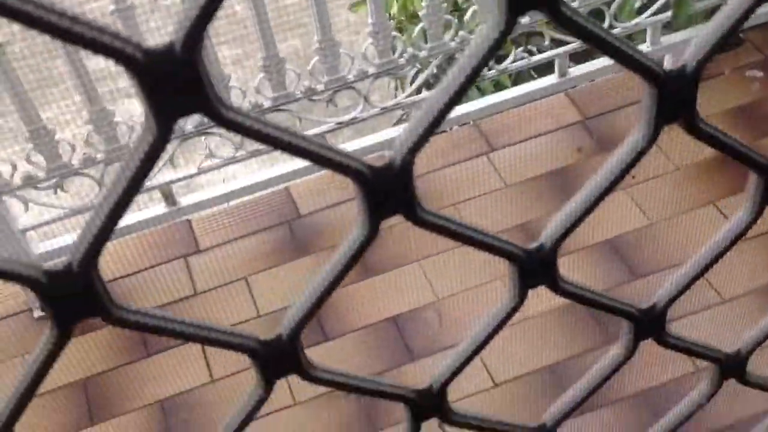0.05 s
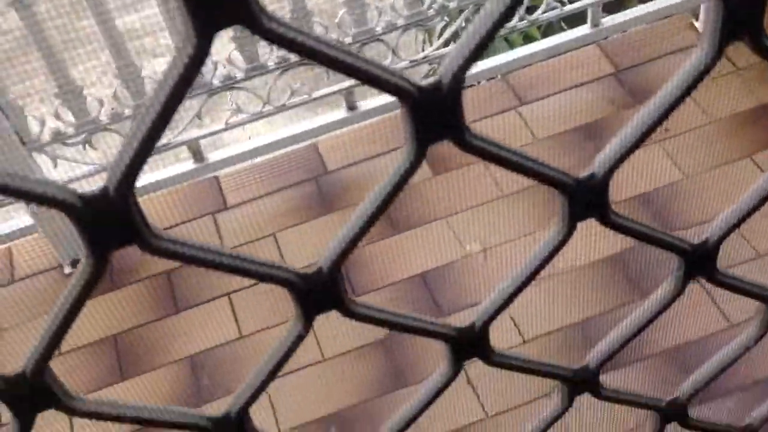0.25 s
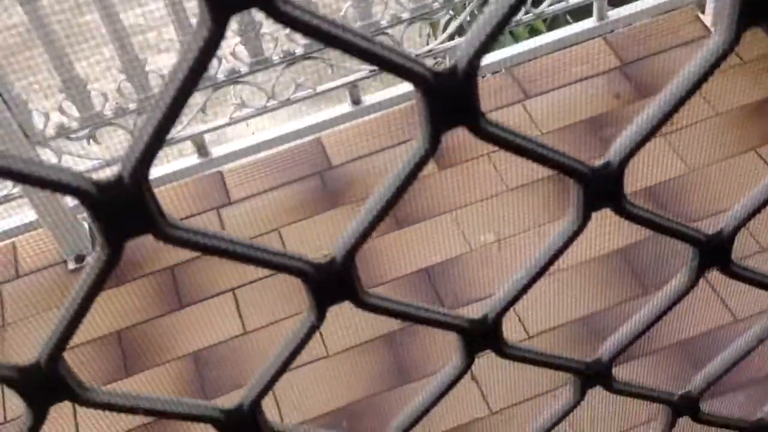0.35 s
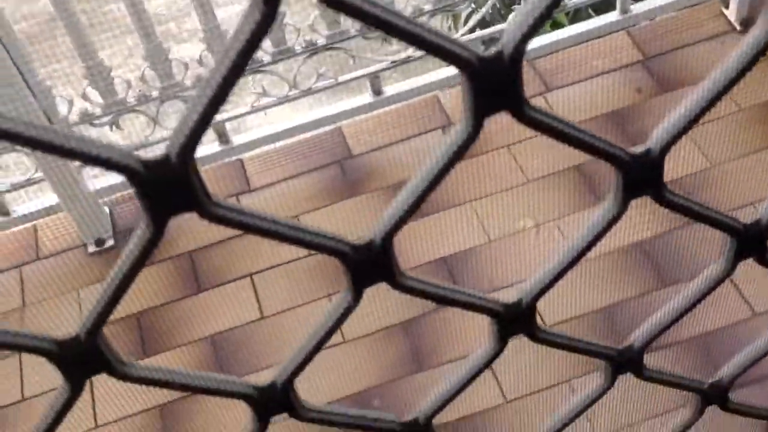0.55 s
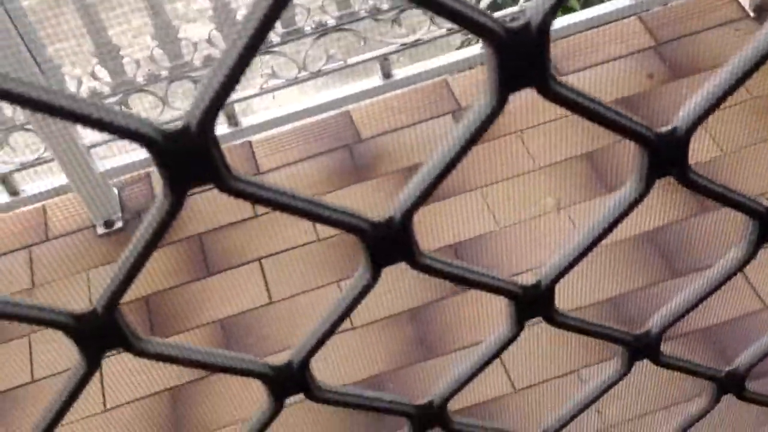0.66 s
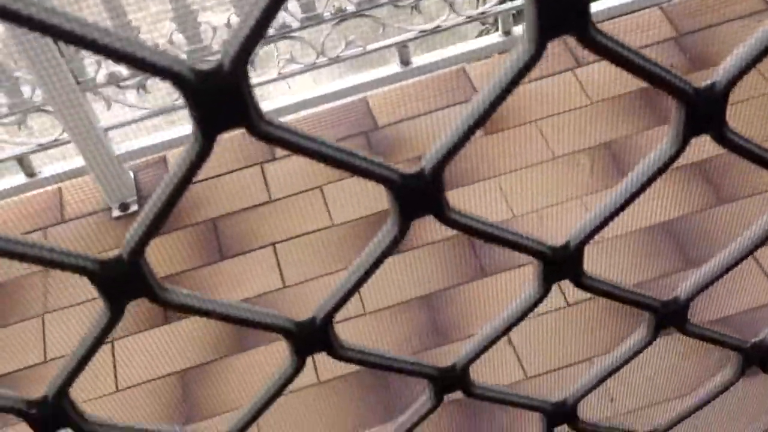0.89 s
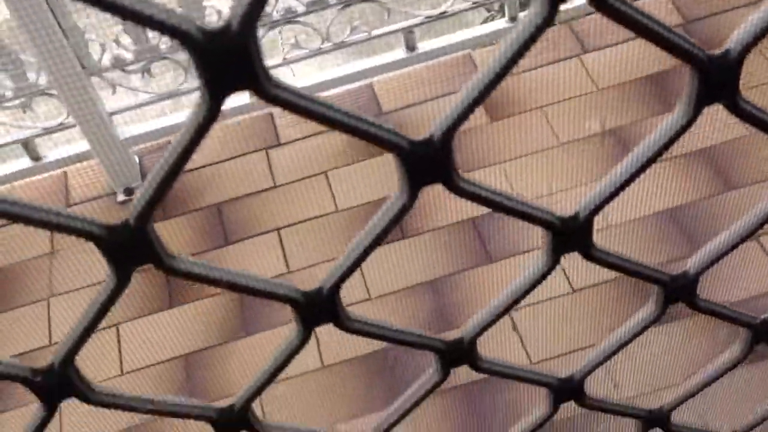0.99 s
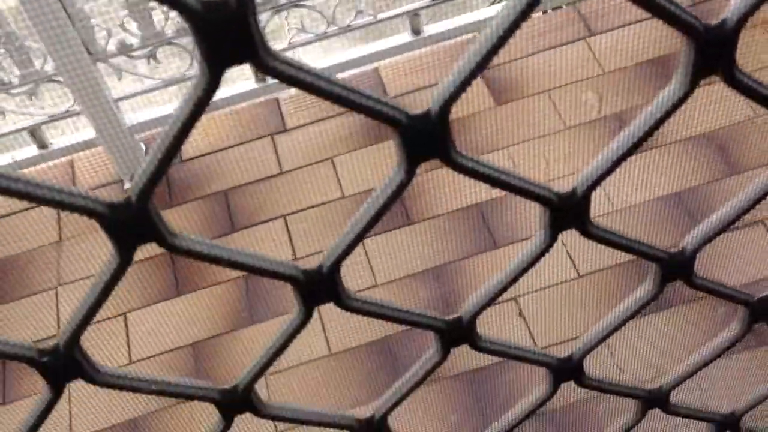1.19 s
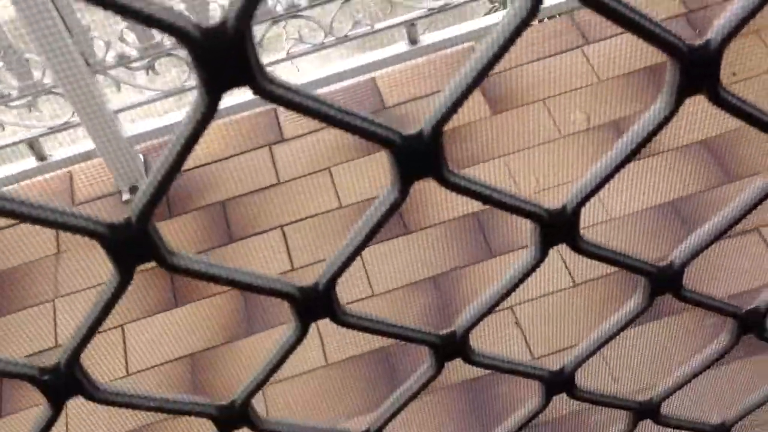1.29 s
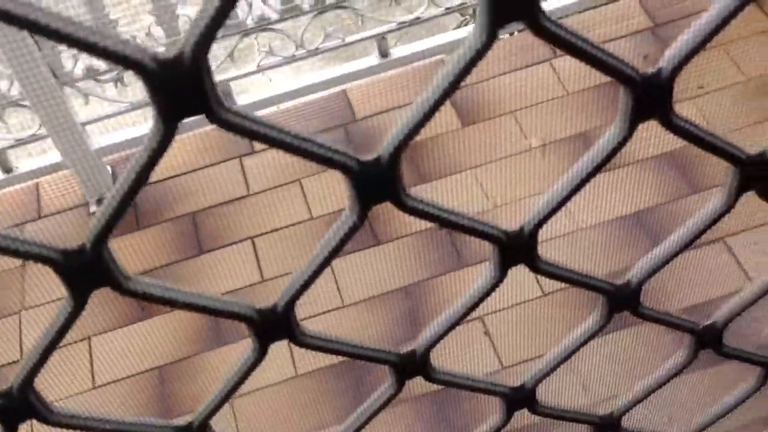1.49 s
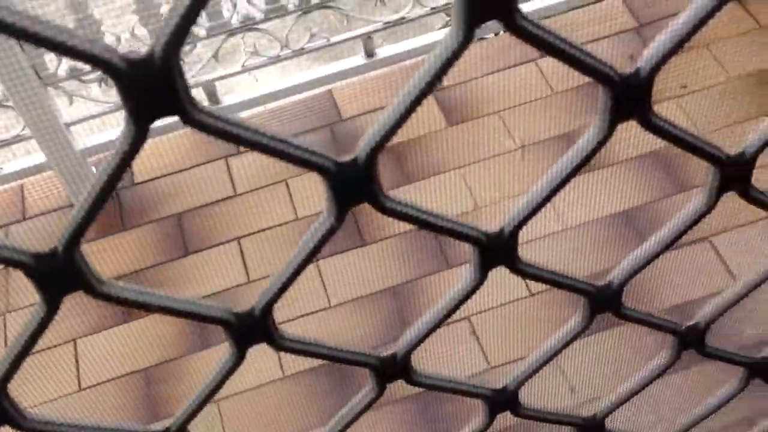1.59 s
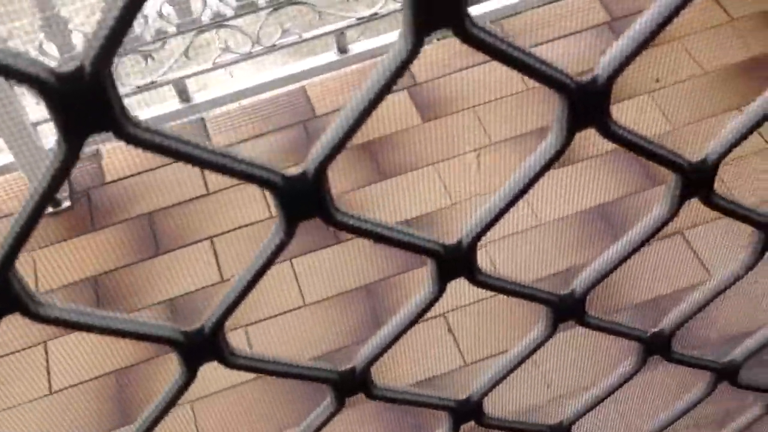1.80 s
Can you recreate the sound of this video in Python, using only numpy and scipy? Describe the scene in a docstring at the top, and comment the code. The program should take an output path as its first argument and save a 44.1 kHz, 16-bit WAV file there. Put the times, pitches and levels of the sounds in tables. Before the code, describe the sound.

A metal grille door's latch clacks, then the door bangs shut and rattles.

```python
"""A latch clacks and rattles over faint outdoor hiss as a metal grille door on a tiled porch is worked
shut; then the door bangs into its frame and chatters. Each impact excites dense, quickly damped
resonances and the ringing modes of latch or bars, and reflections from the hard walls reverberate.
A loose part clinks; a light tap, a small friction squeak and faint rustling follow.
A small bird whistles thinly while the door is being shut."""
import sys
import numpy as np
from scipy import signal
from scipy.fft import rfft, irfft, next_fast_len
from scipy.io import wavfile

SR = 44100
rng = np.random.default_rng(int(sys.argv[2]) if len(sys.argv) > 2 else 0)


def dump(signal):
    """Clip the signal to [-1, 1] and save it as 16-bit WAV at the path in sys.argv[1]."""
    limited = np.clip(np.atleast_2d(signal).T, -1, 1)
    pcm = np.round(limited * 32767).astype(np.int16)
    wavfile.write(sys.argv[1], SR, pcm)


N = 81585
T = np.arange(N) / SR


def from_db(db):
    """Amplitude ratio of a level: a factor of ten per 20 dB."""
    return 10 ** (np.asarray(db) / 20)


def unit_rms(x):
    """Normalisation to a root-mean-square value of one."""
    return x / np.sqrt(np.mean(x ** 2) + 1e-20)


def at_hz(points, hz):
    """Linear interpolation on a logarithmic frequency axis."""
    f, values = np.transpose(points)
    return np.interp(np.log(hz + 1e-3), np.log(f), values)


def coloured(x, spectrum):
    """Causal minimum-phase filtering of unit power gain: only the spectrum's shape counts."""
    size = 2 * next_fast_len(N // 2 + 4096, real=True)
    gain = unit_rms(from_db(at_hz(spectrum, np.arange(size // 2 + 1) * SR / size)))
    cepstrum = irfft(np.log(gain))[:size // 2]
    response = np.exp(2 * rfft(cepstrum, size) - cepstrum[0])
    return irfft(rfft(x, size) * response)[:N]


def noise(spectrum):
    """Stationary Gaussian noise, spectrally shaped, with an rms near one."""
    return coloured(rng.standard_normal(N), spectrum)


def fluctuation(cutoff_hz, shape=N):
    """Random modulation: low-pass noise of unit rms."""
    lowpass = signal.butter(2, cutoff_hz, fs=SR, output="sos")
    return unit_rms(signal.sosfilt(lowpass, rng.standard_normal(shape)))


def octaves(x):
    """Complementary filter bank: overlapping octave bands that sum to x, as (centre/Hz, band)."""
    size = next_fast_len(N, real=True)
    centres = 110 * 2. ** np.arange(8)
    spectrum, hz = rfft(x, size), np.arange(size // 2 + 1) * SR / size
    return [(c, irfft(spectrum * at_hz(np.c_[centres, centres == c], hz), size)[:N]) for c in centres]


def decay(start, t60, rise=.0012):
    """Exponential damping after a quick rise: the level falls 60 dB in t60 seconds."""
    age = np.maximum(T - start, 0)
    return (1 - np.exp(-age / rise)) * np.exp(-np.minimum(np.log(1000) * age / t60, 20))


def struck_modes(start, modes):
    """Free vibration after one blow: a superposition of damped sinusoids."""
    return sum(from_db(db) * decay(start, t60) * np.sin(2 * np.pi * hz * (T - start))
               for hz, db, t60 in modes)


# Spectra of the outdoor hiss and rumble: f/Hz, relative density level/dB
HISS_SPECTRUM = [(40, -26), (150, 8), (400, -2), (1000, 0), (2400, -2), (5000, -5), (9000, -12),
                 (15000, -24.5)]
RUMBLE_SPECTRUM = [(25, -14), (55, -13), (80, -2.5), (110, -15.5), (165, 0), (300, -0.5), (500, -12),
                   (1000, -13.5), (3000, -29.5)]
# Their envelopes: t/s, level/dB
HISS_LEVELS = [(0, -54), (.2, -53.5), (1.2, -53.5), (1.44, -56.5), (1.65, -53), (1.85, -54)]
RUMBLE_LEVELS = [(0, -55.5), (.2, -62), (1.15, -54.5), (1.4, -57), (1.7, -60), (1.8, -51), (1.85, -53)]
def background():
    """Ambient noise: outdoor hiss and distant rumble add incoherently, each drifting in level."""
    hiss = from_db(np.interp(T, *np.transpose(HISS_LEVELS))) * noise(HISS_SPECTRUM)
    rumble = from_db(np.interp(T, *np.transpose(RUMBLE_LEVELS))) * noise(RUMBLE_SPECTRUM)
    return hiss + rumble


# Soft rustles close by: centre t/s, standard deviation/s, level/dB
RUSTLE_SWELLS = [(1.083, .05, -47.5), (1.32, 0.061, -54.5), (1.593, 0.084, -57.5), (1.767, 0.035, -51.5)]
# Their spectrum: f/Hz, relative density level/dB
RUSTLE_SPECTRUM = [(40, -39), (200, -4), (900, -13.5), (1900, -5.5), (2450, 2.5), (3100, -8), (3900, -3),
                   (7000, -18), (15000, -37)]
def rustles():
    """Amplitude modulation: noise swells and fades under Gaussian envelopes."""
    swells = sum(from_db(db) * np.exp(-.5 * ((T - centre) / width) ** 2)
                 for centre, width, db in RUSTLE_SWELLS)
    return swells * noise(RUSTLE_SPECTRUM)


# Bird whistles: t/s, duration/s, start f/Hz, end f/Hz, level/dB
BIRD_WHISTLES = [(0.124, 0.039, 6140, 6200, -51.5), (0.525, 0.081, 6330, 6300, -36),
                 (0.669, 0.079, 6630, 6640, -38), (0.802, 0.076, 6900, 7100, -41)]
def bird(waver_hz=70, flutter_db=3):
    """Thin gliding tones, roughened by random frequency and amplitude modulation."""
    out = 0
    waver, flutter = fluctuation(150, (2, N))
    for start, length, start_hz, end_hz, db in BIRD_WHISTLES:
        progress = np.clip((T - start) / length, 0, 1)
        hz = start_hz + (end_hz - start_hz) * np.sin(np.pi * progress / 2) + waver_hz * waver
        envelope = from_db(db + flutter_db * flutter) * np.sin(np.pi * progress)
        out += envelope * np.sin(2 * np.pi * np.cumsum(hz) / SR)
    return out


# Course of the squeak: t/s, f/Hz, level/dB
SQUEAK_TRACK = [(1.525, 2666, -57), (1.535, 2700, -45), (1.546, 2466, -50), (1.562, 2410, -55),
                (1.59, 2430, -87)]
def squeak(half_width_hz=230):
    """Friction tone: narrow-band noise about a slightly falling centre frequency."""
    times, hz, db = np.transpose(SQUEAK_TRACK)
    in_phase, quadrature = fluctuation(half_width_hz, (2, N))
    phase = 2 * np.pi * np.cumsum(np.interp(T, times, hz)) / SR
    tone = unit_rms(in_phase * np.cos(phase) + quadrature * np.sin(phase))
    return tone * from_db(np.interp(T, times, db)) * (T > times[0]) * (T < times[-1])


# Reverberation time of the tiled porch: f/Hz, T60/s
PORCH_T60 = [(150, 1.08), (400, 1.21), (1000, 0.79), (2700, 0.71), (7000, 0.59), (14000, 0.53)]
def porch_tail(start, hz):
    """Reverberant envelope: wall reflections build up and die away, the lows lasting longest."""
    return decay(start, at_hz(PORCH_T60, hz), rise=.0033)


# Dull spectrum of the tap: f/Hz, relative density level/dB
TAP_SPECTRUM = [(40, -43), (120, -17), (400, -2), (800, -1.5), (1150, 0), (1850, -2), (3500, -9.5),
                (5000, -20), (15000, -40)]
# Its modes: f/Hz, level/dB, T60/s
TAP_RESONANCES = [(1107, -38, 0.077), (1810, -46, 0.062)]
def tap(start=1.4816, level_db=-37.5, room_db=-13):
    """A light impact: a noise burst, two heavily damped modes and a little reverberation."""
    lowest_hz = TAP_RESONANCES[0][0]
    envelope = decay(start, t60=.049) + from_db(room_db) * porch_tail(start, lowest_hz)
    return from_db(level_db) * envelope * noise(TAP_SPECTRUM) + struck_modes(start, TAP_RESONANCES)


# Modes of a small loose part: f/Hz, level/dB, T60/s
CLINK_MODES = [(3890, -27.5, 0.096), (4860, -31, 0.11), (5405, -27.5, 0.098), (5630, -32, 0.12),
               (5440, -27.5, 0.093), (7950, -47, 0.12)]
def clink():
    """Free vibration of a loose part, struck once as the door settles."""
    return struck_modes(.7815, CLINK_MODES)


def impacts(contacts, spectrum, bass_hz=710, treble_hz=4860, buzz_db=1.5):
    """Dense resonances overlap into noise: each contact snaps, cracks, clatters and reverberates."""
    out = 0
    buzz = from_db(buzz_db * fluctuation(253))
    for hz, band in octaves(rng.standard_normal(N)):
        bass_shelf = 1 / (1 + (hz / bass_hz) ** 2)
        treble_shelf = 1 / (1 + (treble_hz / hz) ** 2)
        clatter_t60 = .26 * (treble_hz / max(hz, treble_hz)) ** .98  # damping grows in the treble
        power = 0
        for start, db, bass_db, treble_db, room_db, rise, snap_db in contacts:
            snap = from_db(snap_db) * decay(start, t60=.02, rise=rise)
            crack = decay(start, t60=.095, rise=rise)
            clatter = from_db(-5) * decay(start, clatter_t60, rise)
            direct_power = (snap ** 2 + crack ** 2 + clatter ** 2) * buzz ** 2
            tail = from_db(room_db - 9) * porch_tail(start, hz)
            gain = from_db(db + bass_shelf * bass_db + treble_shelf * treble_db)
            power += gain ** 2 * (direct_power + tail ** 2)  # incoherent parts add in power
        out += band * np.sqrt(power)
    return coloured(out, spectrum)


def ringing(contacts, modes, level_db, spread_db=1.5):
    """Impulse response of metal: each contact drives each mode with random sign and strength."""
    times, contact_db = np.transpose(contacts)[:2]
    out, chance = 0, rng.standard_normal((len(times), 2, len(modes)))
    for k, (hz, mode_db, t60) in enumerate(modes):
        strength = from_db(level_db + contact_db + mode_db + spread_db * chance[:, 1, k])
        impulses = np.full(N, 1e-18)
        impulses[(times * SR).astype(int)] = np.sign(chance[:, 0, k]) * strength
        radius, angle = np.exp(-np.log(1000) / (t60 * SR)), 2 * np.pi * hz / SR  # resonator poles
        out += signal.lfilter([0, np.sin(angle)], [1, -2 * radius * np.cos(angle), radius ** 2], impulses)
    return out


# Latch contacts: t/s, relative level/dB, bass/dB, treble/dB, reverberation offset/dB, rise/s, snap/dB
LATCH_CONTACTS = [(0.2165, -29, 10, -1, 3, 0.01, -20), (0.2368, -18, -6, 2.5, -4, .004, -5),
                  (0.3135, -13, -7, 7.5, -9, 0.0018, 5), (0.3230, -17, -12, -4, -11, 0.00069, 10.5),
                  (0.3296, -14.5, -2.5, 1, -9, 0.00033, 4.5), (0.3485, -20.5, 11.5, -7, -4, .003, -10),
                  (0.4168, -26, -1, 1, -3, 0.0011, 0), (0.43, -22.5, 5, -7.5, 1, 0.0011, -6),
                  (0.4608, -14.5, -1, 0.5, -6, 0.0019, 6), (0.5352, -22.5, 6, -24, 9.5, 0.00064, -3)]
# Dense resonances of the latch: f/Hz, relative density level/dB
LATCH_SPECTRUM = [(40, -64), (100, -48), (280, -20), (500, -25), (620, -17), (850, -17), (1250, -6),
                  (1800, -6.5), (2150, -2.5), (2420, -1), (2800, -4.5), (3350, -11), (3720, -2.5),
                  (4200, -10.5), (4500, -6), (5000, -13.5), (5500, -10.5), (7500, -20), (8700, -20),
                  (10500, -30), (13000, -29), (15500, -33.5)]
# Its ringing modes: f/Hz, relative level/dB, T60/s
LATCH_RESONANCES = [(1378, -8, .38), (1530, -9, .28), (2298, 0, .38), (2400, 1, .22), (2444, 3, .24),
                    (2570, -2, .2), (2890, -8, .26), (3680, 2, .34), (3785, -2, .22), (3920, -5, .2),
                    (4435, -3, .26), (5400, -7, .2), (5860, -8, .26), (7920, -11, .18)]
def latch():
    """Impact excitation: worked back and forth, the latch clacks and rings at its natural frequencies."""
    clacks = impacts(LATCH_CONTACTS, LATCH_SPECTRUM)
    return clacks + ringing(LATCH_CONTACTS, LATCH_RESONANCES, level_db=-19.5)


# Door contacts: t/s, relative level/dB, bass/dB, treble/dB, reverberation offset/dB, rise/s, snap/dB
DOOR_CONTACTS = [(0.5542, -11, -7, -2, 6, .001, 0), (0.565, -13.5, 5.5, -1, 4.5, 0.0013, -3),
                 (0.576, -11.5, -5, 0, 2.5, 0.0027, -4), (0.618, -21.5, -1, -1, 7, .001, -7),
                 (0.635, -18, 1.5, -3, 4, 0.0012, 2), (0.712, -40.5, 4, 18, -0.5, 0.0015, -4),
                 (0.745, -25.5, 8, -13, -2, 0.0011, 7), (0.7812, -28, -6, 0, -6, 0.00074, 7),
                 (0.9965, -56.5, -2, 19, -16, 0.00041, 7)]
# Dense resonances of the door: f/Hz, relative density level/dB
DOOR_SPECTRUM = [(40, -52), (100, -44.5), (170, -24), (270, -17), (550, -15.5), (900, -9), (1200, -5),
                 (1500, -1.5), (1780, -5), (2000, -4), (2350, 1.5), (2680, -2), (2980, -5.5), (3450, -7.5),
                 (3850, -2), (4500, -8.5), (5300, -7.5), (7200, -15), (8300, -15.5), (10300, -25),
                 (13000, -26), (15500, -33)]
# Ringing modes of the grille's bars: f/Hz, relative level/dB, T60/s
BAR_MODES = [(904, -14, .8), (1184, -6, .75), (1290, -6, .6), (1440, -6, .7), (1582, -3, .5),
             (1624, -2, .55), (1906, 0, .42), (2014, -1, .42), (2272, -4, .75), (2372, -4, .72),
             (2447, -1, .75), (2660, 3, .45), (2832, -1, .4), (3120, -6, .55)]
def door():
    """Repeated impact: the door bangs and chatters in its frame, and its lightly damped bars ring on."""
    return impacts(DOOR_CONTACTS, DOOR_SPECTRUM) + ringing(DOOR_CONTACTS, BAR_MODES, level_db=-17.5)


def scene():
    """Superposition: the sound pressures of all sources add at one microphone."""
    return (background() + rustles() + latch() + door() + clink() + tap() + squeak() + bird())[None]


def record(dry, headroom=.78, low_cut_hz=113, high_cut_hz=15300):
    """Soft saturation rounds the peaks; the microphone's bass roll-off and a low-pass limit the band."""
    rounded = headroom * np.tanh(dry / headroom)
    thin = signal.sosfilt(signal.butter(2, low_cut_hz, "high", fs=SR, output="sos"), rounded)
    return signal.sosfilt(signal.ellip(12, .1, 80, high_cut_hz, fs=SR, output="sos"), thin)


dry = scene()
out = record(dry)
dump(out)
```